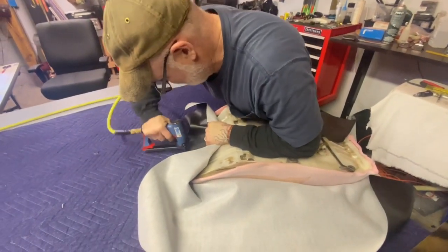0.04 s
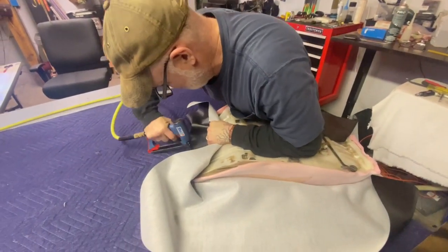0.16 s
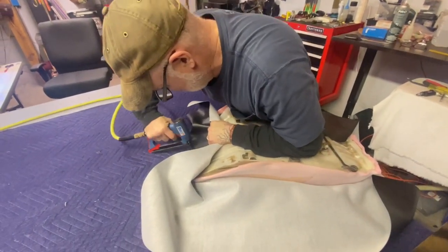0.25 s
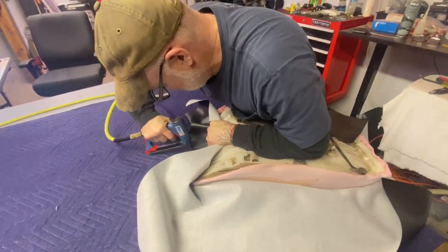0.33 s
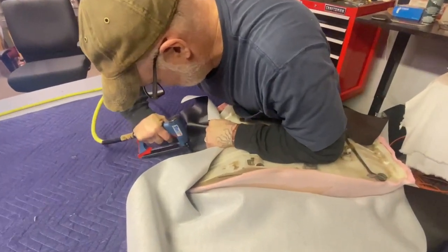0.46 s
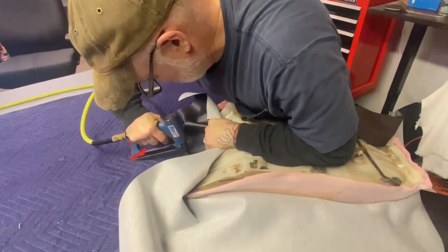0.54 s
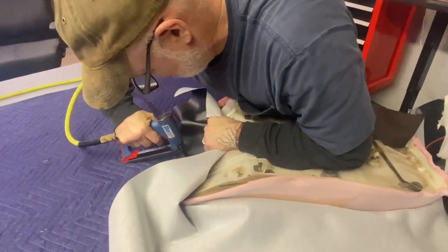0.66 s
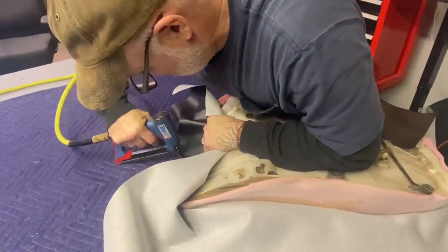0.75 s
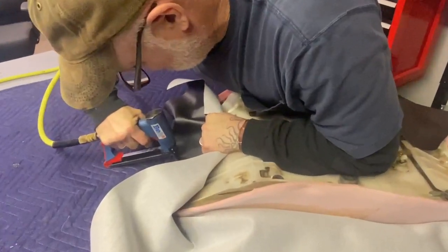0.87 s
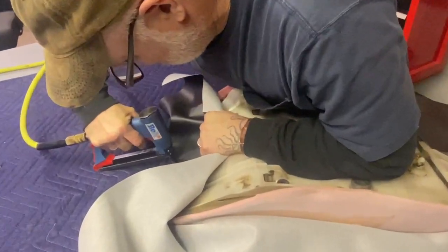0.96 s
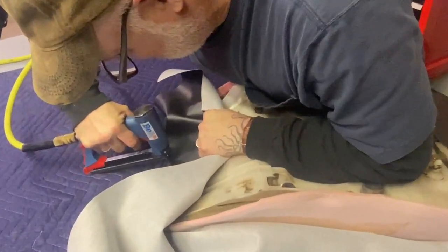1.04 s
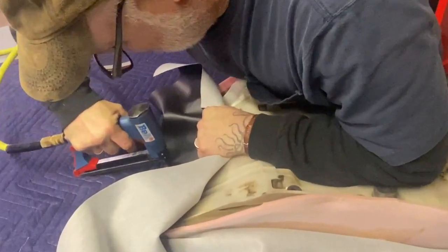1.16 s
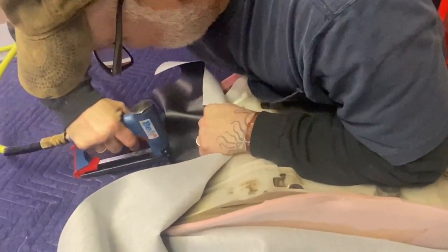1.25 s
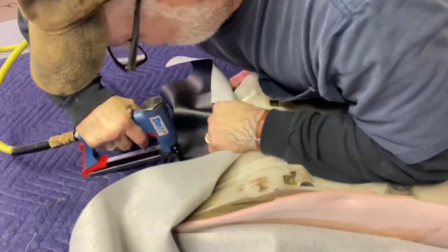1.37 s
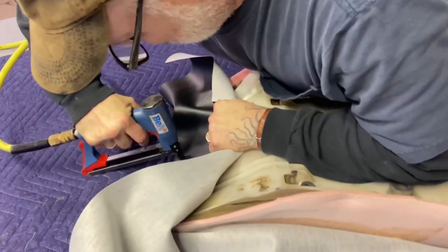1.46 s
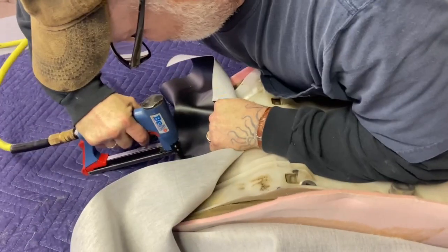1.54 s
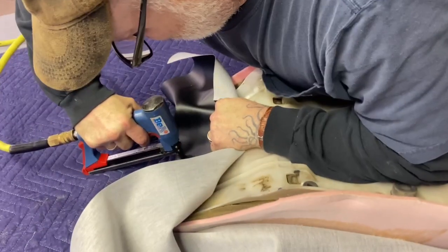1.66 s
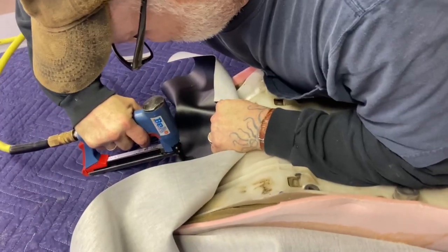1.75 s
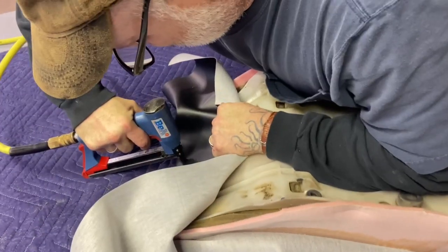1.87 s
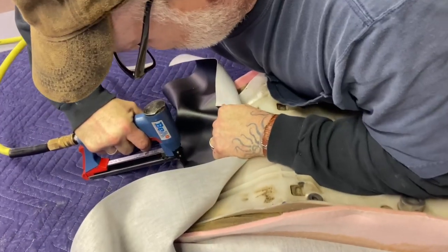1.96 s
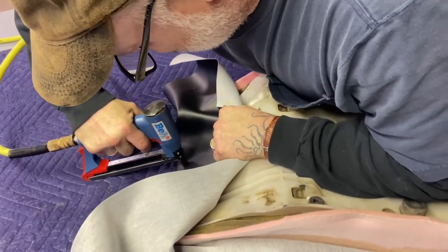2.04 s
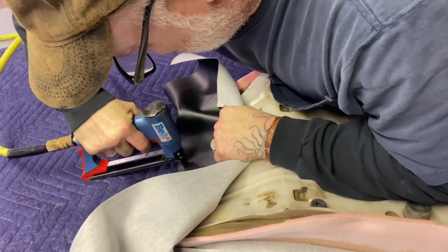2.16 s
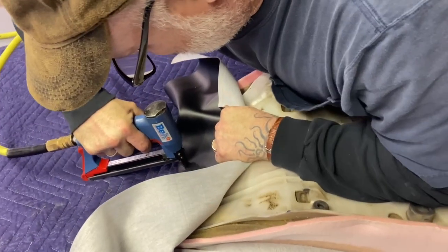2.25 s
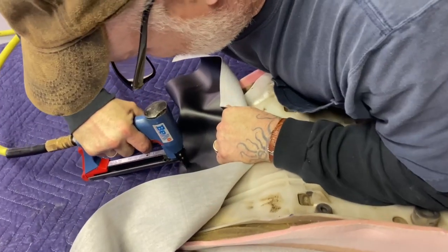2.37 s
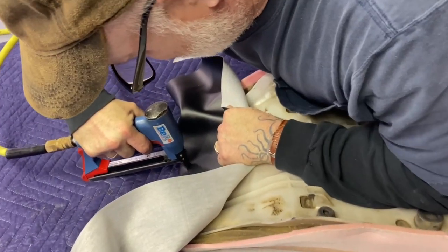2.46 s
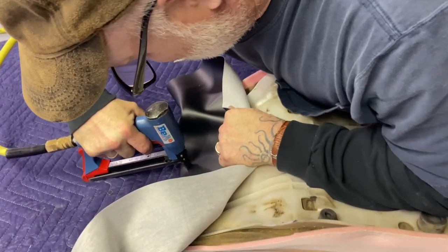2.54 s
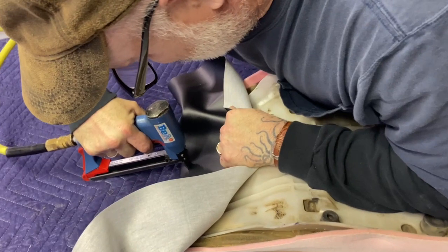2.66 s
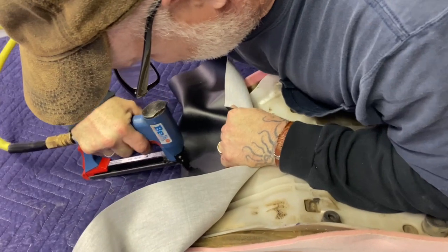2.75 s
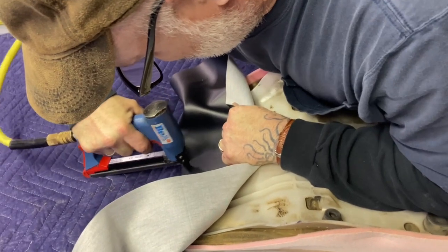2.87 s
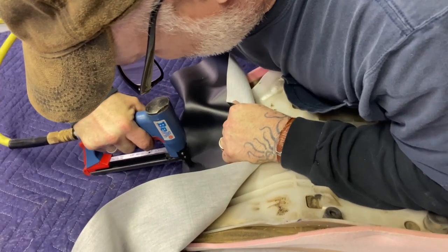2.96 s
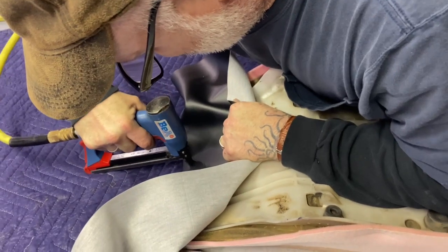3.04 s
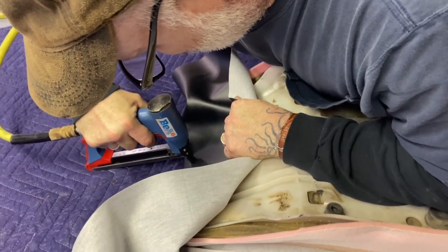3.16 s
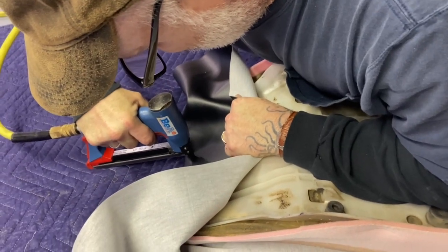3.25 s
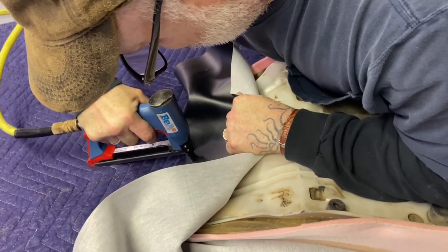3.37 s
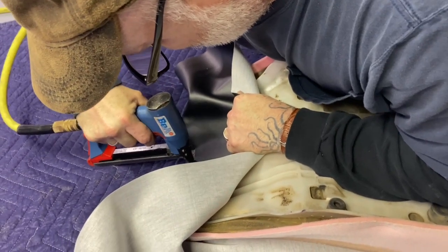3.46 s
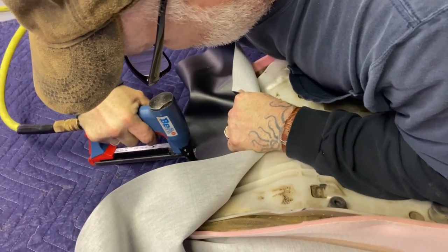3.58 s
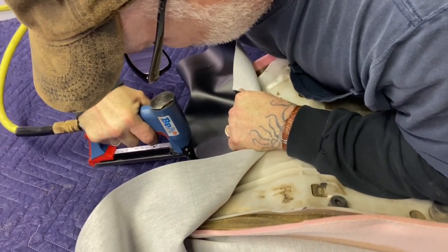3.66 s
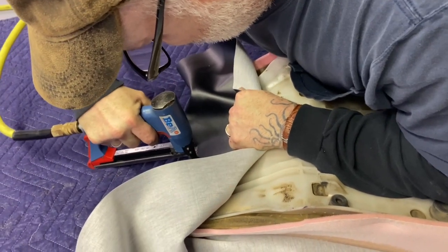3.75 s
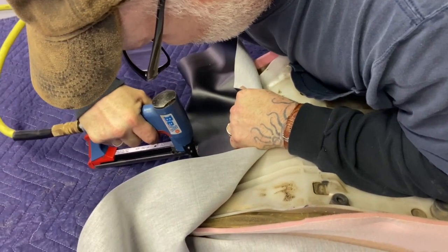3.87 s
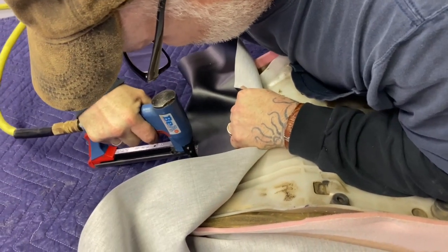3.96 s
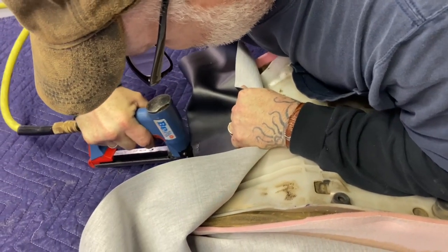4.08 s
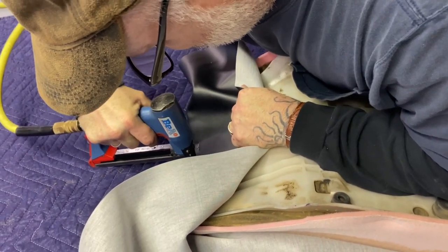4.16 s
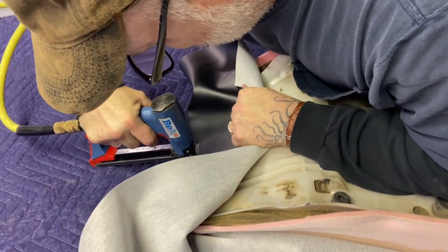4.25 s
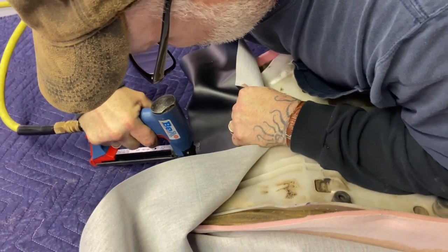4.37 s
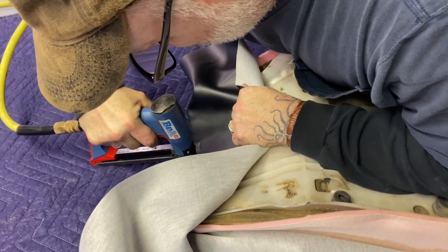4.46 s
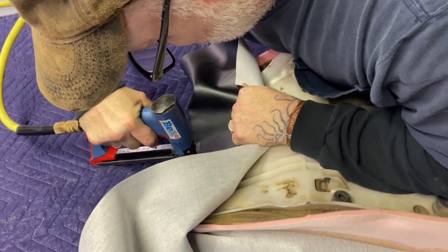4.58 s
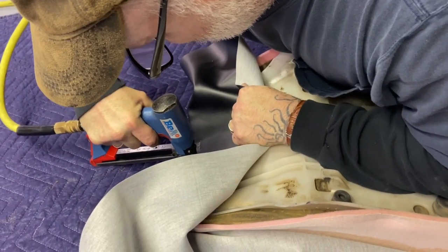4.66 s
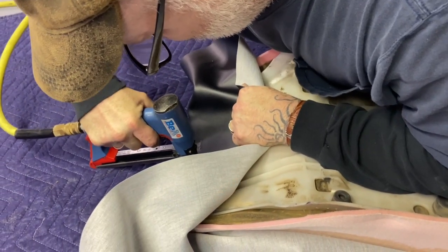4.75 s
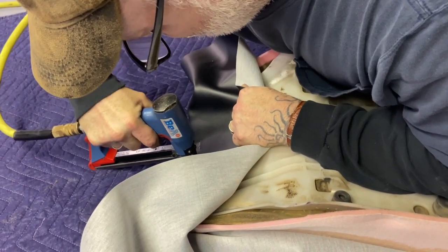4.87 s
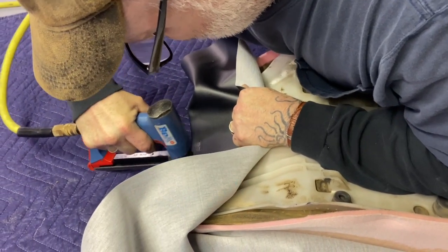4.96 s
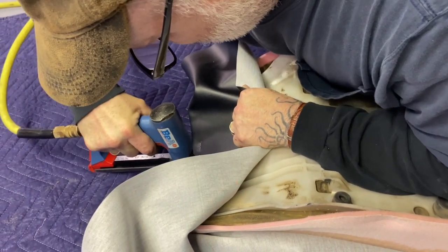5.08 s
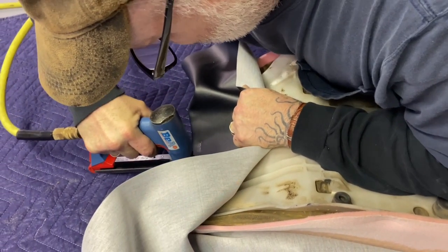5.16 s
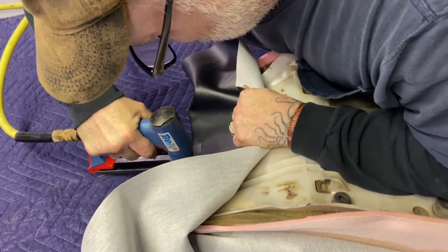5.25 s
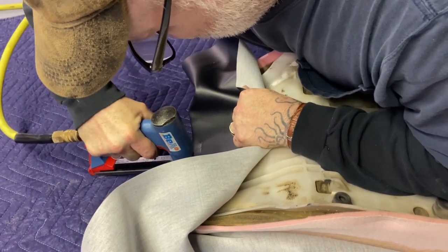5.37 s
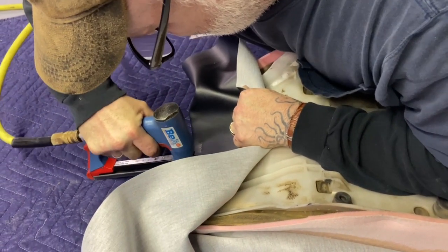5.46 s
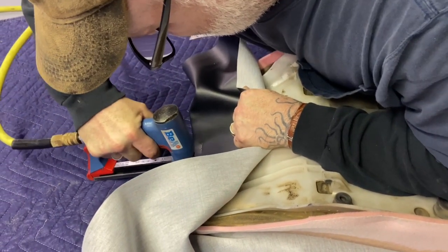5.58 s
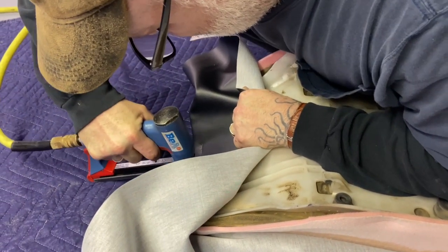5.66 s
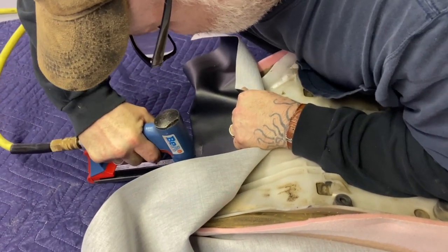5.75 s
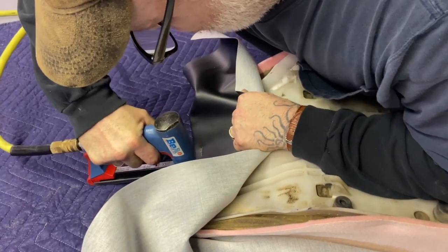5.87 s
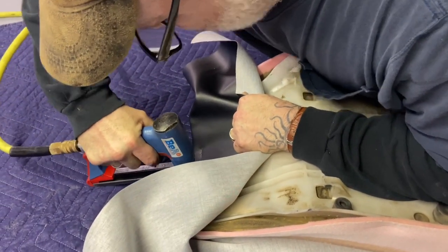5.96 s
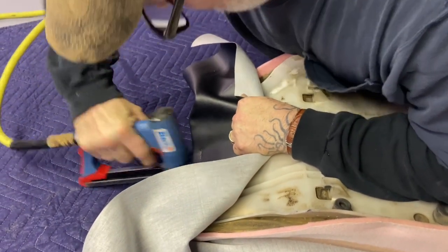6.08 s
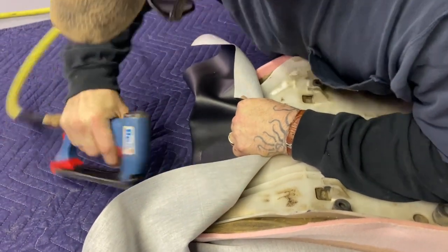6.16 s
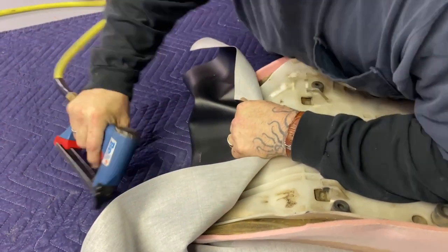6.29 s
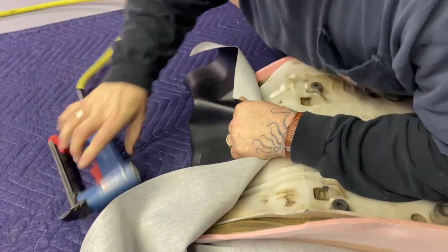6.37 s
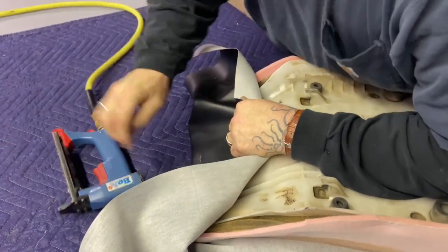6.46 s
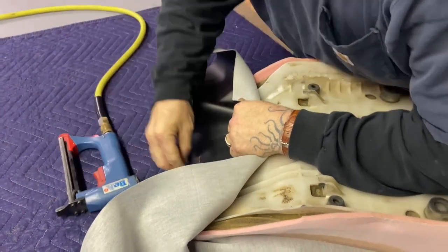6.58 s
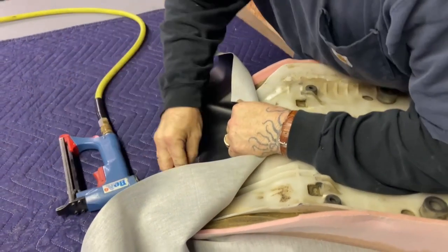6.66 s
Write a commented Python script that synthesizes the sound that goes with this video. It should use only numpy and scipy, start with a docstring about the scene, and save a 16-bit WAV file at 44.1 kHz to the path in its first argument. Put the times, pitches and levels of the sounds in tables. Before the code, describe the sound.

Soft vinyl rustling, tiny ticks and faint taps open over a low room rumble. Five loud air-stapler blows follow at uneven intervals; the first have a brief rising hiss before impact, the later ones are more abrupt, harder and brighter. Each ends in a metallic clack and puff of air. The tool is then laid on a quilted bench with a deep thud. Close stereo microphone, short room reverberation.

```python
"""In a small workshop, a pneumatic stapler fires five staples into a vinyl-covered seat on a padded bench.
Inrush and exhaust are shaped noise; the driver, the returning piston and the tool's taps excite damped modes.
Hands rub and crackle the vinyl as friction noise and short bursts, the bench thumps, and the tool is laid down.
The room adds a diffuse decay over a low rumble, a faint hiss and a faint wavering hum."""
import sys
import numpy as np
from scipy import signal
from scipy.fft import rfft, irfft
from scipy.io import wavfile
from scipy.ndimage import uniform_filter1d

SR = 44100
rng = np.random.default_rng(int(sys.argv[2]) if len(sys.argv) > 2 else 0)


def dump(signal):
    """Clip the signal to [-1, 1] and save it as 16-bit WAV at the path in sys.argv[1]."""
    limited = np.clip(np.atleast_2d(signal).T, -1, 1)
    pcm = np.round(limited * 32767).astype(np.int16)
    wavfile.write(sys.argv[1], SR, pcm)


N = 296352
T = np.arange(N) / SR  # s
HZ = np.maximum(np.arange(N // 2 + 1) * SR / N, 1)  # frequency of each Fourier bin

# Shots: (drive stroke start [s], air rush length [s], rush level [dB], blow level [dB], landing hardness [dB])
SHOTS = [(2.571, 0.055, -16.5, -2.5, 0), (3.2583, 0.055, -16, -3, 0.5), (3.8445, 0.025, -18.5, -4, 1.5),
         (4.7346, 0.023, -20, -4.5, 4), (5.8373, .013, -23.5, -6.5, 5)]
# Trigger releases: (time [s], knock level [dB], exhaust level [dB])
RELEASES = [(2.693, -12.5, -13), (3.3571, -15.5, -15), (3.9846, -12, -13), (4.868, -11.5, -12.5),
            (5.9664, -12.5, -15)]
# Contacts of the drive stroke: (delay [ms], level into tool [dB], level into seat [dB], push [ms])
DRIVE_CONTACTS = [(.9, -3.5, -16, 0.41), (1.6, -16.5, 1.5, .6), (4.3, -3.5, -6, 1.1), (5.8, -10, 0.5, 0.27),
                  (7.4, -7, 3.5, 0.38), (8.9, -16, 0, 1.3)]
# Contacts of the return stroke: (delay [ms], level into tool [dB], level into seat [dB], push [ms])
RETURN_CONTACTS = [(1.02, -2.5, -12, 0.99), (2.87, -8.5, 3.5, 0.88), (26.12, -2, -7.5, 0.18),
                   (27.72, -9, -1, 0.93)]
# Modes of the metal tool: (frequency [Hz], level [dB], t60 [s])
TOOL_MODES = [(1860, 0, 0.0091), (2380, 5, 0.01), (2920, 1.5, 0.01), (3270, 1.5, 0.0035),
              (5142, -14.5, 0.0059), (6800, -13.5, 0.0084), (7650, -10.5, 0.027)]
# Modes of the tool housing: (frequency [Hz], level [dB], t60 [s])
HOUSING_MODES = [(126, 0, 0.09)]
# Modes of the seat: (frequency [Hz], level [dB], t60 [s])
SEAT_MODES = [(186.4, -5, 0.081), (510, -1, 0.012), (730, -2.5, 0.02), (993, -7, 0.03), (1380, -5.5, 0.013)]
# Modes of the plastic seat pan: (frequency [Hz], level [dB], t60 [s])
PAN_MODES = [(311, -3.5, 0.031), (643, -3, 0.023), (1045, 4, 0.02), (1340, -5.5, 0.033), (1520, -15, .02),
             (2180, -3.5, 0.021), (2820, -7, 0.011)]
# Modes of the bench: (frequency [Hz], level [dB], t60 [s])
BENCH_MODES = [(58.7, -3.5, 0.15), (79.4, -13, 0.16), (138, 2.5, 0.069), (168, -1.5, 0.066),
               (237, -1, 0.024), (320.4, -10, 0.08), (367.5, -5.5, 0.029), (558, -8.5, 0.051),
               (940, -18, .04)]
# Spectrum of the air rushing in: (frequency [Hz], level per Hz [dB])
RUSH_SPECTRUM = [(300, -16.5), (1700, -13.5), (2500, -2), (5700, -12), (7500, -2.5), (10900, 1),
                 (15600, -5), (16200, -23)]
# Spectrum of the exhaust: (frequency [Hz], level per Hz [dB])
EXHAUST_SPECTRUM = [(300, -9.5), (1000, -1), (2500, 0.5), (5000, 2), (8000, -0.5), (11000, 0.5),
                    (15600, -5), (16200, -22)]
# Spectrum of the shaking seat board and cover: (frequency [Hz], level per Hz [dB])
RATTLE_SPECTRUM = [(60, -14), (130, -5), (250, -0.5), (600, 1), (1200, -2.5), (2500, -2.5), (4000, -11.5),
                   (8000, -27.5), (16000, -34)]
# Taps of the tool on seat or bench: (time [s], knock level [dB], click level [dB], click centre [Hz], push [ms])
TAPS = [(0.065, -29.5, -49, 900, 0.41), (1.269, -37, -42, 1520, 0.3), (3.787, -34.5, -49, 1320, 0.15),
        (3.793, -26.5, -31.5, 1350, 0.14), (5.076, -21.5, -42, 1930, 0.88), (6.372, -41.5, -52, 2050, 1),
        (6.401, -28.5, -28, 2300, 0.83), (6.411, -21.5, -26, 2270, 1), (6.423, -20.5, -27, 2485, 0.78),
        (6.591, -44, -55, 1300, 0.36)]
# Knocks of the nose on the seat pan: (time [s], level [dB], push [ms])
PAN_KNOCKS = [(1.121, -28, 0.21), (1.644, -25.5, 0.1)]
# Blows on the padded bench: (time [s], level [dB], push [ms])
THUMPS = [(0.129, -30.5, 12), (.328, -43, 1.6), (0.467, -38, 3.8), (1.277, -40, 0.53), (1.361, -41.5, 0.67),
          (5.08, -26, 3.8), (5.151, -46.5, 3.7), (6.376, -18.5, 4.5), (6.402, -7, 1.8), (6.412, 2.5, 1.63),
          (6.422, -9, 2), (6.455, -15, 4), (6.484, -17, 5.9), (6.535, -16, 11), (6.566, -22.5, 11)]
# Vinyl crackles: (time [s], peak level [dB], centre frequency [Hz])
CRACKLES = [(0.021, -41, 1030), (0.117, -48.5, 790), (0.2798, -58, 980), (.328, -45.5, 1300),
            (0.369, -46, 1010), (0.458, -44, 1100), (0.5194, -56, 970), (0.6304, -50.5, 1480),
            (0.7754, -44, 905), (0.9, -42.5, 1110), (.9383, -44, 1300), (1.005, -49.5, 1180),
            (1.1614, -64, 1600), (1.4168, -48, 2480), (1.444, -47.5, 1120), (1.67, -43, 1350),
            (1.8975, -56, 1040), (2.1255, -53, 2260), (2.15, -59.5, 3322), (2.499, -54, 1260),
            (2.9672, -48, 1590), (2.99, -49.5, 1217), (3.0963, -57, 1330), (3.1423, -49, 1500),
            (3.166, -54, 1420), (4.2526, -59, 1816), (4.316, -60, 2460), (4.3275, -56.5, 1774),
            (4.457, -61.5, 1050), (4.5013, -59, 1130), (5.7965, -50.5, 1180), (6.1416, -44, 1400),
            (6.1705, -49, 1350), (6.205, -54, 1400), (6.2294, -50, 1400), (6.267, -57, 1290),
            (6.5617, -55, 2600)]
# Bright ticks as the vinyl lets go of the hand: (time [s], peak level [dB])
TICKS = [(0.0157, -48.5), (0.1894, -66), (0.225, -59), (0.2604, -59), (0.2788, -56), (0.294, -54),
         (0.3064, -60), (0.3277, -51), (0.3691, -58), (0.404, -54), (0.4189, -56), (0.4449, -51),
         (0.4585, -50), (0.5134, -56), (0.5564, -60), (0.6238, -53), (0.766, -54.5), (0.9744, -67),
         (1.345, -61), (1.3758, -68), (1.397, -54), (6.2964, -66), (6.314, -52)]
# Hands and tool sliding on vinyl and quilt: (full pressure from [s], held [s], level [dB],
# relative treble level [dB], relative scrape level [dB], grip [0-1])
SLIDES = [(0, 0.12, -53, -1.5, -6.5, 0.5), (0.199, 0.3, -58, -1, -15, 0.5),
          (0.631, 0.014, -75, 11, -18, 0.7), (.78, 0.19, -72, 4, -8, 0.9), (1.08, 0.03, -71, 13.5, 2, 0.2),
          (1.182, 0.1, -52.5, 5.5, -4.5, 0.2), (1.391, 0.031, -59, -7, -12, 0.9),
          (1.66, .02, -63, -2, -39, 1), (2.13, 0.037, -77.5, 15, 1, 0.6), (5.269, .2, -73, -5.5, -4, 0.3),
          (5.69, 0.075, -61, 2, -3.5, 0), (6.252, 0.036, -61.5, 2.5, -10, 0.5),
          (6.457, 0.038, -45, -2.5, -1.5, 0.4), (6.601, 0.02, -59, -19, -4.5, 0.4)]
# Spectrum of rubbing: (frequency [Hz], level per Hz [dB])
RUB_SPECTRUM = [(100, -28), (160, -2.5), (400, -5), (1280, -10.5), (2500, -19), (4600, -29.5), (6500, -35),
                (14000, -39.5)]
# Flat spectrum: (frequency [Hz], level per Hz [dB])
WHITE_SPECTRUM = [(20, 0), (20000, 0)]
# Reverberation of the workshop: (frequency [Hz], t60 [s])
ROOM_T60 = [(60, 1), (200, 0.5), (600, .45), (1500, 0.49), (4000, 0.47), (8000, 0.41), (11000, 0.27),
            (15000, 0.16)]
# Spectrum of the rumble: (frequency [Hz], level per Hz [dB])
RUMBLE_SPECTRUM = [(15, -38), (25, -15.5), (38, -2), (81, 2), (99, -6), (125, -13.5), (182, -21.5),
                   (214, -22.5), (300, -38), (450, -69)]
# Mean course of the rumble: (time [s], level [dB])
RUMBLE_LEVEL = [(0, -54), (.7, -60.5), (1.5, -50), (1.9, -53.5), (2.1, -50), (2.45, -56), (3, -51.5),
                (3.7, -54), (5.5, -56.5), (6.3, -54.5), (6.72, -66)]
# Mean course of the hum: (time [s], level [dB])
HUM_LEVEL = [(0, -99), (2.5, -79), (4.5, -79), (5.3, -69.5), (6.72, -72.5)]
# Spectrum of the hiss: (frequency [Hz], level per Hz [dB])
HISS_SPECTRUM = [(200, -22), (300, 1), (450, -6.5), (2000, -16.5), (7000, -25), (9000, -21.5), (11000, -15),
                 (13000, -22.5), (16500, -26.5)]
# Course of the hiss about its base level: (time [s], level [dB])
HISS_COURSE = [(0, -4), (2.5, 0), (4.3, -5), (5.15, -9), (6.72, 0)]
# Likeness of the two channels of diffuse sound: (frequency [Hz], correlation [-])
LIKENESS = [(60, .99), (290, .85), (640, .5), (1410, .2), (3100, .85), (6800, .9), (9000, .97)]
# Level difference of the two channels: (frequency [Hz], left minus right [dB])
CHANNEL_LEVEL = [(200, 0), (700, 1), (1290, 2.4), (2380, 3), (4400, .5), (8000, 0)]
# Phase difference of the two channels: (frequency [Hz], left lead [rad])
CHANNEL_PHASE = [(60, .1), (250, .25), (1000, .6), (1720, .75), (3000, .5), (5500, .6), (7000, 0)]

VALVE_S = 0.02  # a trigger pull longer than this opens the valve late and steeply
RATTLE_DB, RATTLE_QUICK_T60_S, RATTLE_SLOW_T60_S = -15.5, 0.064, 0.35
PRESS_DB_PER_S, LIFT_DB_PER_S = 180, 223.5  # how fast a slide swells and dies away
SCRAPE_HZ, SCRAPE_OCTAVES = 1050, 0.69  # the cover resonates here under a slide
TICK_HZ = 3300
ROOM_DB, HISS_DB = -24, -74
HUM_HZ = 213  # mean pitch
LEFT_LAG_S, LEFT_LAG_HZ = .000238, 7000  # above this frequency the left channel lags
BOTTOM_HZ, TOP_HZ = 40, 16500


def undb(db):
    """A level in decibels is twenty times the logarithm of an amplitude ratio."""
    return 10 ** (np.asarray(db) / 20)


def along(table, hz=HZ):
    """A spectral curve is interpolated linearly on a log-frequency axis."""
    points, values = np.transpose(table)
    return np.interp(np.log(hz), np.log(points), values)


def course(table):
    """A slowly changing level is interpolated linearly in time."""
    return np.interp(T, *np.transpose(table))


def noise(spectrum):
    """Filtering white noise gives random sound of a chosen colour, here of rms 1."""
    x = irfft(rfft(rng.standard_normal(N)) * undb(along(spectrum)), N)
    return x / x.std()


def diffuse(spectrum):
    """Independent mid and side noises, shared out by correlation, form a two-channel diffuse field."""
    alike = along(LIKENESS)
    mid = rfft(noise(spectrum)) * np.sqrt((1 + alike) / 2)
    side = rfft(noise(spectrum)) * np.sqrt((1 - alike) / 2)
    return irfft(np.array([mid + side, mid - side]), N)


def walk(rate):
    """Random values drawn rate times a second and smoothed give a fluctuation of spread near 0.4."""
    hold = int(SR / rate)
    steps = np.repeat(rng.standard_normal(N // hold + 1), hold)
    return 0.48 * uniform_filter1d(steps, hold)[:N]


def ring(modes, push_ms):
    """A struck body sums damped modes, and a longer half-sine push excites the high ones less; peak 1."""
    t = T[:int(SR * max(t60 for _, _, t60 in modes)) + 64]
    body = np.zeros(len(t))
    for k, (hz, db, t60) in enumerate(modes):
        # every blow excites the modes a little differently
        level_db = db + 1.5 * rng.standard_normal()
        mode_hz = hz * (1 + .012 * rng.standard_normal())
        decay = undb(level_db - 60 * t / max(t60, .002))
        body += (-1) ** k * decay * np.sin(2 * np.pi * mode_hz * t)
    # the half-sine is cut off after 400 samples, about 9 ms
    phase = np.clip((np.arange(400) + .5) / max(push_ms * SR / 1000, 1), 0, 1)
    body = signal.fftconvolve(body, np.sin(np.pi * phase))
    return body / np.abs(body).max()


def crack(hz, octaves, t60):
    """A sudden fracture-like burst is decaying noise, band-limited to some octaves either side of hz; peak 1."""
    t = T[:int(SR * t60)]
    edges = [hz * 2 ** -octaves, min(hz * 2 ** octaves, .45 * SR)]
    band = signal.butter(4, edges, "band", fs=SR, output="sos")
    burst = signal.sosfilt(band, rng.standard_normal(len(t)) * undb(-60 * t / t60))
    return burst / np.abs(burst).max()


def add(track, s, sound):
    """Sounds superpose linearly: add one to the track from time s."""
    i = int(s * SR)
    track[..., i:i + sound.shape[-1]] += sound[..., :N - i]


def stroke(start_s, contacts, db, landing_db=0):
    """Successive impacts excite tool and seat; a hard landing favours later contacts and higher modes."""
    out = np.zeros(N)
    tool = []
    for hz, mode_db, t60 in TOOL_MODES:
        tilt_db = 5.8 * landing_db * np.log2(min(hz, 3400) / 2600)
        tool.append((hz, mode_db + tilt_db, t60))
    for k, (delay_ms, tool_db, seat_db, push_ms) in enumerate(contacts):
        s = start_s + delay_ms / 1000
        metal_db = db + tool_db + (landing_db if k else -landing_db)
        add(out, s, undb(metal_db) * ring(tool, .12))
        add(out, s, undb(metal_db - 5.0) * crack(1800, 1.9, 0.0089))
        add(out, s, undb(db + seat_db) * ring(SEAT_MODES, push_ms))
    return out


def air_rush(strike_s, rush_s, rush_db):
    """Inflow grows with the valve opening and dies once the piston bottoms: gain of one inrush."""
    opening = np.clip((T - strike_s + rush_s) / rush_s, 0, 1)
    flow = np.sin(np.pi / 2 * opening) ** (2 * rush_s / VALVE_S)
    # a gentle fall for 10 ms, then a steep one (dB per s)
    fall_db = 51 * np.clip(T - strike_s, 0, .01) + 7400 * np.maximum(T - strike_s - .01, 0)
    return undb(rush_db - fall_db) * flow


def exhaust_flow(release_s, air_db):
    """Outflow falls as the cylinder empties, after a short leak as the valve shifts: gain of one exhaust."""
    late = T - release_s
    leak = np.exp(-((late - .0003) / 0.0011) ** 2)
    opening = np.clip((late - .004) / 0.00064, 0, 1)
    emptying = undb(-420 * np.abs(late)) + undb(-31.5 - 120 * np.abs(late))
    return undb(air_db) * (undb(-14.5) * leak + opening * emptying)


def stapler():
    """Turbulent flow and impact alternate: inrush, drive stroke, return stroke and exhaust of each shot."""
    blows, rush, exhaust = np.zeros(N), np.zeros(N), np.zeros(N)
    for s, rush_s, rush_db, blow_db, landing_db in SHOTS:
        blows += stroke(s, DRIVE_CONTACTS, blow_db, landing_db)
        rush += air_rush(s, rush_s, rush_db)
    for s, knock_db, air_db in RELEASES:
        blows += stroke(s, RETURN_CONTACTS, knock_db)
        exhaust += exhaust_flow(s, air_db)
        add(blows, s + 0.0051, undb(air_db - 0.5) * ring(HOUSING_MODES, 1.7))
    # the blows carry little deep bass
    blows = signal.sosfilt(signal.butter(2, 52, "high", fs=SR, output="sos"), blows)
    flutter = undb(2.5 * walk(60))
    return blows + rush * noise(RUSH_SPECTRUM) + exhaust * flutter * noise(EXHAUST_SPECTRUM)


def rattle():
    """Loosely coupled seat board and cover shake on after each staple, with a quick and a slow decay."""
    shake = np.zeros(N)
    for s, _, _, blow_db, _ in SHOTS:
        late = np.maximum(T - s - .006, 0)
        quick = undb(-60 * late / RATTLE_QUICK_T60_S)
        slow = undb(-12.0 - 60 * late / RATTLE_SLOW_T60_S)
        onset = np.clip(late / 0.00047, 0, 1)
        shake += undb(blow_db + RATTLE_DB) * onset * (quick + slow)
    return shake * undb(1.1 * walk(150)) * diffuse(RATTLE_SPECTRUM)


def taps():
    """Impact rings the softer body low while the metal nose clicks; further knocks of the nose ring the plastic
    seat pan."""
    out = np.zeros(N)
    for s, knock_db, click_db, click_hz, push_ms in TAPS:
        add(out, s, undb(knock_db) * ring(SEAT_MODES, push_ms))
        add(out, s, undb(knock_db - 13) * crack(520, 0.51, .06))
        add(out, s, undb(click_db) * crack(click_hz, 0.78, 0.019))
        add(out, s, undb(click_db - 10.5) * crack(7000, 0.94, 0.017))
    for s, db, push_ms in PAN_KNOCKS:
        add(out, s, undb(db) * ring(PAN_MODES, push_ms))
        add(out, s, undb(db - 8.0) * crack(1650, 0.76, 0.013))
        add(out, s, undb(db - 18.5) * crack(5200, 1.14, 0.0077))
        add(out, s, undb(db - 16.5) * crack(790, 0.86, 0.099))
    return out


def bench():
    """Soft blows through the quilt excite low bench modes; shorter pushes shake loose things on it more."""
    out = np.zeros(N)
    for s, db, push_ms in THUMPS:
        add(out, s, undb(db) * ring(BENCH_MODES, push_ms))
        add(out, s, undb(db - 29.0 - 1.2 * push_ms) * crack(730, 0.99, .095))
        add(out, s, undb(db - 8 - 1.6 * push_ms) * crack(160, 0.9, .099))
    return out


def crackles():
    """Snap-through of vinyl folds gives a bright edge and a brief flutter; release ticks are short and bright."""
    out = np.zeros(N)
    for s, db, hz in CRACKLES:
        add(out, s, undb(db) * crack(hz, 0.99, 0.0021))
        add(out, s, undb(db - 8.5) * crack(2 * hz, 0.73, 0.01))
        add(out, s, undb(db - 6.5) * crack(hz, 0.87, .09))  # flutter of the sheet
    for s, db in TICKS:
        add(out, s, undb(db) * crack(TICK_HZ, 0.52, 0.007))
    return out


def pressure():
    """Friction grows with contact pressure: gain of each slide as it swells, holds and dies away."""
    gains = []
    for s, held_s, db, *_ in SLIDES:
        swell_db = PRESS_DB_PER_S * np.maximum(s - T, 0)
        lift_db = LIFT_DB_PER_S * np.maximum(T - s - held_s, 0)
        gains.append(undb(db - swell_db - lift_db))
    return np.array(gains)


def stick_slip(grip):
    """Stick-slip friction releases in random decaying grains, stronger with grip, over a steady flow; rms 1."""
    slips = (rng.random(N) < 90 / SR) * undb(np.minimum(4 * rng.exponential(size=N), 10))  # 90 per s on average
    grains = signal.lfilter([1], [1, -np.exp(-1 / (0.0029 * SR))], slips)  # 2.9 ms time constant
    grain = .5 + grip * grains
    return grain / np.sqrt(np.mean(grain ** 2))


def slides():
    """Sliding friction makes a soft body of noise, with scrape and treble broken into stick-slip grains."""
    gain = pressure()
    _, _, _, treble_db, scrape_db, grip = np.transpose(SLIDES)
    level = gain.sum(axis=0)
    grain = stick_slip(grip @ gain / level)
    rub = diffuse(RUB_SPECTRUM)
    low = signal.sosfiltfilt(signal.butter(2, 1500, fs=SR, output="sos"), rub)
    resonance = np.exp(-(np.log2(HZ / SCRAPE_HZ) / SCRAPE_OCTAVES) ** 2)
    scrape = irfft(rfft(diffuse(WHITE_SPECTRUM)) * resonance, N)
    scrape = undb(scrape_db) @ gain * grain * scrape / scrape.std()
    body = level * np.sqrt(grain) * low
    treble = undb(treble_db) @ gain * grain * (rub - low)
    return undb(3.3 * walk(30)) * (scrape + body + treble)


def tail():
    """A diffuse field decays exponentially in each half-octave band, after a 45 ms build-up; energy 1."""
    white, out = rfft(diffuse(WHITE_SPECTRUM)), 0
    t = T[:SR]
    for hz in 40 * 2 ** np.arange(0, 9, .5):
        band = np.clip(1 - 2 * np.abs(np.log2(HZ / hz)), 0, 1)
        out = out + irfft(white * band, N)[:, :SR] * undb(-60 * t / along(ROOM_T60, hz))
    out = out * np.clip(t / 0.045, 0, 1)
    return out / np.sqrt(np.mean(np.sum(out ** 2, axis=1)))


def reverberation(near):
    """Reverberation is the convolution of the source with the room's diffuse decay."""
    return undb(ROOM_DB) * signal.fftconvolve(near[None], tail(), axes=1)[:, :N]


def rumble():
    """Low-frequency diffuse noise fluctuates in level about a slow course."""
    return diffuse(RUMBLE_SPECTRUM) * undb(course(RUMBLE_LEVEL) + 6.7 * walk(5.1))


def hum():
    """A sine whose phase integrates a wandering frequency is a thin low tone, here unsteady in level too."""
    level = np.sqrt(2) * undb(course(HUM_LEVEL) + 5 * walk(0.66))
    hz = HUM_HZ * (1 + 0.029 * walk(12))
    return level * np.sin(2 * np.pi * np.cumsum(hz) / SR)


def hiss():
    """Faint broadband diffuse noise has no pitch, only a colour and a slowly changing level."""
    return undb(HISS_DB + course(HISS_COURSE)) * diffuse(HISS_SPECTRUM)


def scene():
    """Superposition: near sources, their reverberation, rattle and slides over the background."""
    near = stapler() + taps() + bench() + crackles()
    return near + reverberation(near) + rattle() + slides() + rumble() + hum() + hiss()


def record(dry):
    """Two channels differ in level and phase; saturation rounds loud peaks, and filters cut bottom and top."""
    lead = along(CHANNEL_PHASE) - 2 * np.pi * LEFT_LAG_S * np.maximum(HZ - LEFT_LAG_HZ, 0)
    half = undb(along(CHANNEL_LEVEL) / 2) * np.exp(.5j * lead)  # each channel takes half the difference
    spectrum = rfft(dry * np.clip(T / 0.0028, 0, 1))  # 2.8 ms fade-in
    channels = irfft(spectrum * np.array([half, 1 / half]), N)
    channels = np.tanh(0.82 * channels) / 0.89
    channels = signal.sosfilt(signal.butter(4, BOTTOM_HZ, "high", fs=SR, output="sos"), channels)
    return signal.sosfilt(signal.ellip(10, .2, 80, TOP_HZ, fs=SR, output="sos"), channels)


dry = scene()
out = record(dry)
dump(out)
```